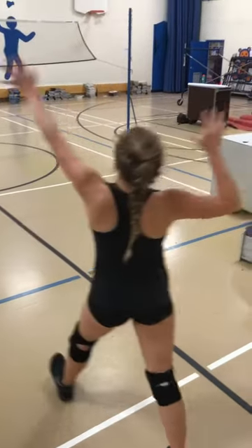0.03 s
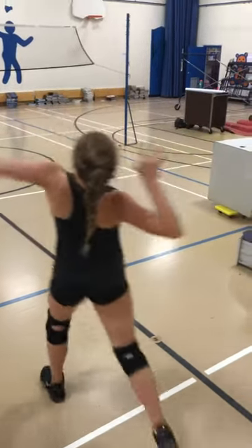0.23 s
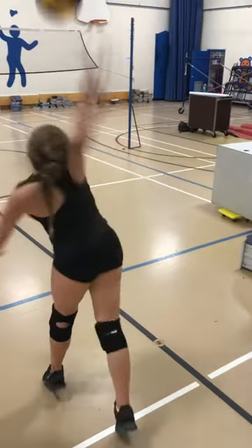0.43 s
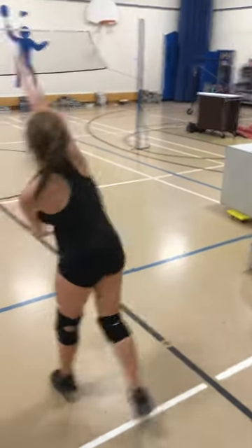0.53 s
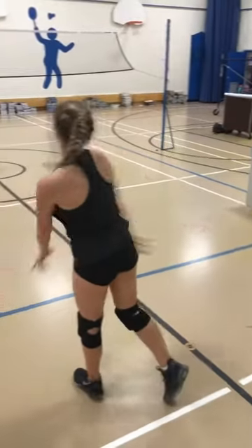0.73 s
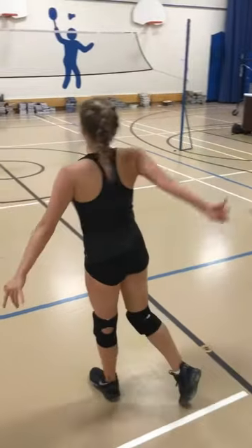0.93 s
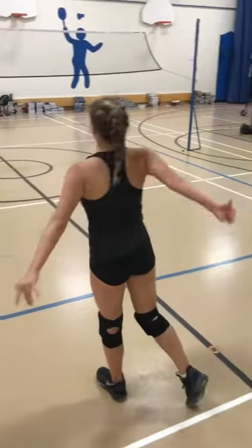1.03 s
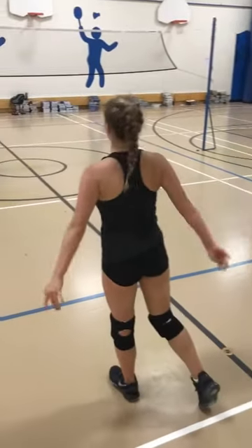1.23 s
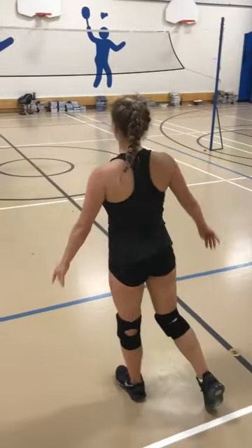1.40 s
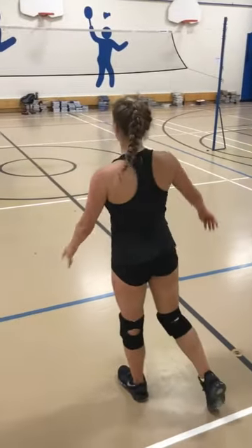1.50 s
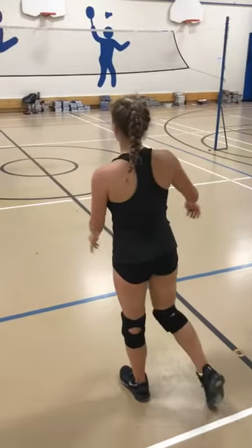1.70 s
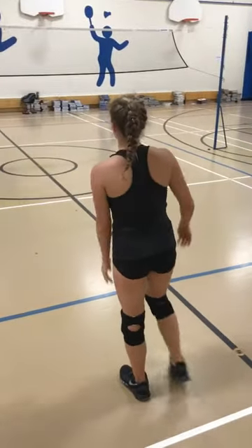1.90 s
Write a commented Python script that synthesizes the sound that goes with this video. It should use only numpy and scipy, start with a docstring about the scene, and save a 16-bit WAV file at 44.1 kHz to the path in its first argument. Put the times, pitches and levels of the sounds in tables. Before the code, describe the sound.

A volleyball is smacked hard, then lands further off in an echoing gym.

```python
"""A volleyball serve in a large gym. Over faint ventilation, clothes swish as the arm swings; a faint tick,
then the hand smacks the ball close to the microphone: a crack, a thump and the ring of the air inside it.
A second later the ball lands further off with a duller blow, and a light tap follows. The blows come back
from floor and walls and die away in a long, boomy reverberation."""
import sys
import numpy as np
from scipy import signal
from scipy.fft import rfft, irfft, next_fast_len
from scipy.io import wavfile
from scipy.ndimage import uniform_filter1d

SR = 44100
rng = np.random.default_rng(int(sys.argv[2]) if len(sys.argv) > 2 else 0)


def master_out(mix):
    """Clip the mix to full scale and print it as 16-bit PCM to the path in sys.argv[1]."""
    frames = np.transpose(np.atleast_2d(mix))
    ceiling = np.clip(frames, -1, 1)
    pcm = np.round(ceiling * 32767).astype(np.int16)
    wavfile.write(sys.argv[1], SR, pcm)


N = 85995
T = np.arange(N) / SR


def from_db(db):
    """Decibels to gain."""
    return 10 ** (np.asarray(db) / 20)


def at_hz(points, hz):
    """Read a table on a log-frequency axis."""
    points = np.array(points)
    return np.interp(np.log(hz), np.log(points[:, 0]), points[:, 1])


def delayed(x, delay_s):
    """The sound, starting later."""
    return np.concatenate([np.zeros(int(delay_s * SR)), x])[:N]


def repeats(x, rows):
    """Copies of the sound, one for each delay and level."""
    return sum(from_db(db) * delayed(x, delay_s) for delay_s, db in rows)


def coloured(x, spectrum):
    """Causal (minimum-phase) filter with the given spectrum."""
    size = next_fast_len(2 * N)
    hz = np.maximum(np.fft.rfftfreq(size, 1 / SR), 1)
    cepstrum = irfft(np.log(from_db(at_hz(spectrum, hz))), size)
    cepstrum[1:size // 2] *= 2
    cepstrum[size // 2 + 1:] = 0
    return irfft(rfft(x, size) * np.exp(rfft(cepstrum)), size)[:N]


# Room tone of the gym, ventilation and hiss: f/Hz, level/dB
ROOM_TONE = [(25, -44.5), (70, -25.5), (130, -34), (250, -43.5), (500, -57.5), (1500, -59), (3000, -61),
             (6000, -69.5), (10000, -76.5), (16000, -68.5)]

def ventilation():
    """Moving air: a steady low rumble with faint hiss."""
    return coloured(rng.standard_normal(N), ROOM_TONE)


# Reverberation time of the gym: f/Hz, t60/s
GYM_DECAY = [(50, 2.92), (110, 2.74), (200, 1.53), (350, 1.35), (650, 1.37), (1100, 1.64), (2200, 1.913),
             (4000, 1.263), (6000, 1.166), (9000, 0.83), (12000, 0.61), (16000, 0.41)]

def gym_response():
    """Diffuse reverberation: third-octave noise bands, each evened out and dying at its own rate."""
    white = rfft(rng.standard_normal(N))
    hz = np.fft.rfftfreq(N, 1 / SR)
    edges = np.geomspace(20, 20000, 31)
    response = np.zeros(N)
    for low, high in zip(edges, edges[1:]):
        band = irfft(white * ((hz >= low) & (hz < high)), N)
        power = uniform_filter1d(band ** 2, size=4000) / (2 * (high - low) / SR) + 1e-9
        t60 = at_hz(GYM_DECAY, np.sqrt(low * high))
        response += band / np.sqrt(power) * from_db(-60 * T / t60)
    return response


def reverberation(spectrum, ringing, ring_db, build_up_s=0.0017):
    """The hall fills with sound and answers both the broad blow and the ringing that follows it."""
    filling = 1 - np.exp(-T / build_up_s)
    blow_tail = coloured(gym_response() * filling, spectrum)
    ring_tail = signal.fftconvolve(ringing, gym_response() * filling)[:N]
    return blow_tail + from_db(ring_db) * ring_tail


def echoes(x, rows, wall_hz):
    """A few dulled reflections from walls and ceiling."""
    treble_loss = signal.butter(2, wall_hz, fs=SR, output="sos")
    return repeats(signal.sosfilt(treble_loss, x + 1e-18), rows)


# The server's clothes, near the microphone: f/Hz, level/dB
CLOTHES = [(500, -95), (3000, -59), (6000, -63.5), (13000, -59), (16000, -70)]

def clothes_swish(peak_s=0.11, width_s=0.055):
    """Cloth rubs as the arm swings: a soft hiss that swells and fades."""
    swing = np.exp(-((T - peak_s) / width_s) ** 2)
    return swing * coloured(rng.standard_normal(N), CLOTHES)


def crack(spectrum, snap_db, slap_db, slap_s, smear_hz):
    """First contact is one sharp snap; a brief rough slap follows as the skin flattens."""
    contact = from_db(slap_db) * rng.standard_normal(N) * np.exp(-T / slap_s)
    contact[0] += from_db(snap_db)
    pole = np.exp(-2 * np.pi * smear_hz / SR)
    for _ in range(3):  # all-passes smear the snap over a fraction of a millisecond
        contact = signal.lfilter([-pole, 1], [1, -pole], contact + 1e-18)
    return coloured(contact, spectrum)


def thump(hz, db, swell_s, sharpness):
    """The ball is squashed and springs back: a few low cycles that swell and die."""
    age = T / swell_s
    return from_db(db) * (age * np.exp(1 - age)) ** sharpness * np.sin(2 * np.pi * hz * T)


def ring(modes, db, swell_s):
    """Struck modes swell, then each dies at its own rate."""
    tones = sum(from_db(db + level - 60 * T / t60) * np.sin(2 * np.pi * hz * T)
                for hz, level, t60 in modes)
    return (1 - np.exp(-T / swell_s)) * tones


# Modes of the ball, heard both close up and across the gym: f/Hz, level/dB, t60/s
BALL_RING = [(348, -3, 0.058), (436, -7, 0.059), (660.5, 5, 0.044), (819, -5, 0.083), (920, 1.5, 0.1),
             (1130, 3, 0.039), (1218, 7.5, 0.058), (1393, 2, 0.06), (1897, 1, 0.044), (2040, -7, 0.13),
             (2405, -3.5, 0.046), (2777, -4.5, 0.061), (2920, -28, .05), (4100, -41, 0.04),
             (4350, -23, 0.034)]

def ball_ring(db, swell_s):
    """The air and skin of the ball ring as it springs free."""
    return ring(BALL_RING, db, swell_s)


# The tap's click at the microphone: f/Hz, level/dB
TAP_CLICK = [(500, -21), (2000, -11), (4000, -14), (6000, -17), (7500, -36), (9500, -27), (11000, -35),
             (12500, -18), (16000, -34)]
# Small touches after the click: t/s, level/dB
TAP_RATTLE = [(0.014, -25), (.0183, -9), (.0218, -24)]
# The tap's tail in the hall: f/Hz, level/dB
TAP_TAIL = [(60, -8.5), (150, -1), (300, -32), (1200, -37), (4500, -38.5), (8000, -48.5), (12500, -55),
            (16000, -60)]

def tap():
    """A light, bright contact with a short rattle after it."""
    click = crack(TAP_CLICK, snap_db=3.5, slap_db=-8, slap_s=0.00095, smear_hz=3000)
    return click + repeats(click, TAP_RATTLE) + coloured(gym_response(), TAP_TAIL)


# Modes of the surface where the ball lands, further off: f/Hz, level/dB, t60/s
SURFACE_RING = [(184.3, 4, 0.13), (221.4, 5.5, 0.08), (287.2, -7.5, 0.25), (503.5, -10, 0.18),
                (905, -6, 0.06), (1055, -2, .08), (1524, 2, 0.055), (1650, -2, 0.049), (1838, -1, 0.044),
                (3096, -4, 0.023)]
# The landing's crack, heard from a distance: f/Hz, level/dB
FAR_CRACK = [(300, -4), (750, -18), (1500, 2), (2300, 4.5), (3200, 1), (4600, -8.5), (7000, -22.5),
             (9000, -18), (11000, -26), (16000, -30)]
# The skin slaps down in quick stages from first contact: t/s, level/dB
SKIN_STAGES = [(0, 0), (.00065, -1), (.0019, -7), (.00255, -7)]
# Reflections reaching the microphone after the landing: t/s, level/dB
FAR_ECHOES = [(0.0168, -10), (0.046, -12.5), (.057, -12.5)]
# The landing's tail in the hall: f/Hz, level/dB
FAR_TAIL = [(30, -28), (55, -8.5), (85, 6.5), (140, 4.5), (190, 6), (240, -9), (330, -14), (430, -17),
            (510, -11.5), (650, -26), (900, -10), (1400, -14.5), (2100, -16.5), (3000, -23.5),
            (4200, -23.5), (6000, -32), (7500, -38), (9300, -38.5), (11000, -43), (16000, -46)]

def landing():
    """The ball lands further off and the surface rings with it: a duller crack, a deeper thump."""
    ringing = ring(SURFACE_RING, db=-23, swell_s=0.00043) + ball_ring(db=-23, swell_s=0.0081)
    snap = crack(FAR_CRACK, snap_db=10, slap_db=-9, slap_s=0.001, smear_hz=2500)
    body = thump(hz=87.5, db=-9, swell_s=0.0078, sharpness=0.89)
    direct = repeats(snap, SKIN_STAGES) + ringing - body
    room = echoes(direct, FAR_ECHOES, wall_hz=3900) + reverberation(FAR_TAIL, ringing, ring_db=-37.5)
    return direct + room


# Hand on ball, close to the microphone: f/Hz, level/dB
CLOSE_CRACK = [(300, 4), (1200, 0), (2500, 3), (4500, -4), (6500, -10.5), (8500, -6.5), (10600, -14),
               (12300, -8.5), (16000, -17)]
# Reflections reaching the microphone after the serve: t/s, level/dB
CLOSE_ECHOES = [(0.034, -38), (.087, -18.5), (.26, -22)]
# The serve's boomy tail in the hall: f/Hz, level/dB
CLOSE_TAIL = [(30, -24), (55, -10), (75, 7), (100, 8.5), (135, 6), (180, 0.5), (230, -11.5), (330, -15),
              (560, -20), (800, -19.5), (1050, -11.5), (1550, -19), (2300, -19), (3600, -23), (5200, -29.5),
              (9000, -29.5), (10700, -34), (12500, -35), (16000, -37)]

def serve(tick_s, hit_s):
    """A faint tick, then the hand smacks the ball, which cracks, thumps and rings into the hall."""
    ringing = ball_ring(db=-10, swell_s=0.009)
    smack = crack(CLOSE_CRACK, snap_db=11, slap_db=-11.5, slap_s=0.003, smear_hz=1800)
    body = thump(hz=136.5, db=2, swell_s=0.011, sharpness=7.2)
    body -= thump(hz=34.7, db=-30, swell_s=0.033, sharpness=2.7)
    floor_echo = from_db(-2) * delayed(smack, 0.00665)  # off the floor under the player
    room = echoes(ringing + from_db(-2.5) * (smack + body), CLOSE_ECHOES, wall_hz=2500)
    room += reverberation(CLOSE_TAIL, ringing, ring_db=-53)
    tick = from_db(-39) * delayed(smack, tick_s)
    return tick + delayed(smack + ringing + body + floor_echo + room, hit_s)


def scene():
    """Serve, landing and tap over the background, at one microphone near the server."""
    blows = serve(tick_s=0.2152, hit_s=0.2383) + delayed(landing(), 1.1930) + delayed(tap(), 1.4523)
    return (blows + ventilation() + clothes_swish())[None]


def record(dry):
    """The loudest peaks overload, and the treble is cut above 15.8 kHz."""
    top_cut = signal.ellip(12, 0.1, 80, 15800, fs=SR, output="sos")
    return signal.sosfilt(top_cut, np.clip(dry, -1, 1))


dry = scene()
out = record(dry)
master_out(out)
```